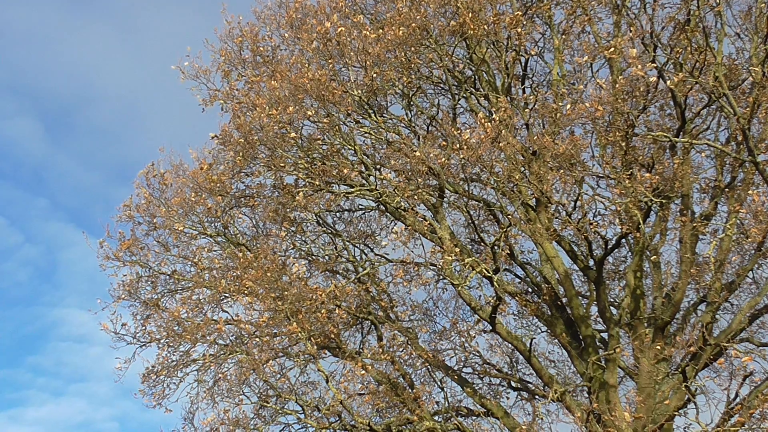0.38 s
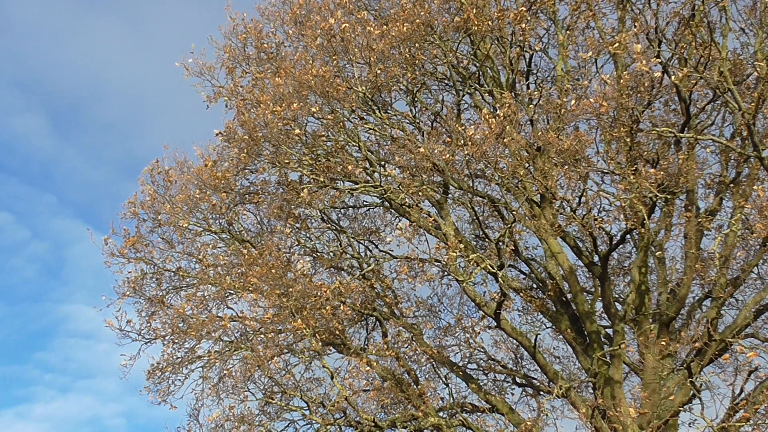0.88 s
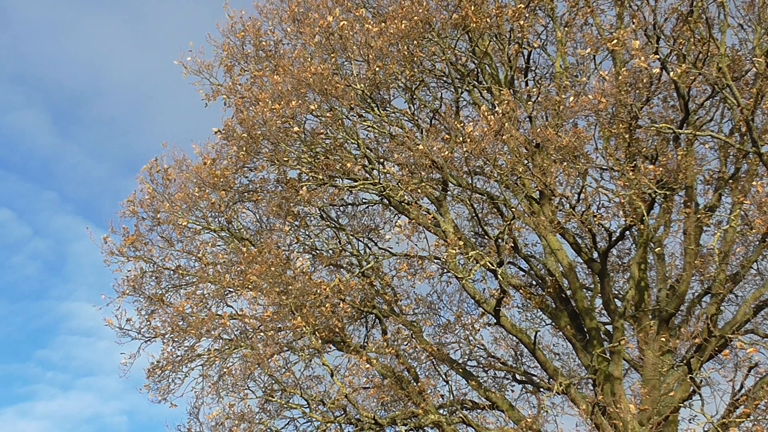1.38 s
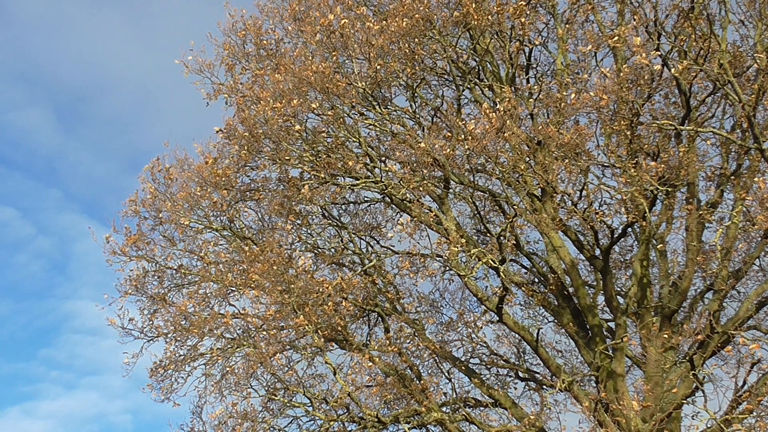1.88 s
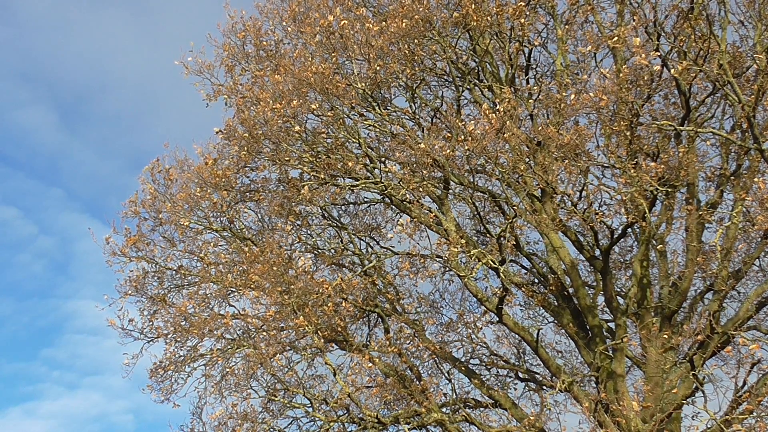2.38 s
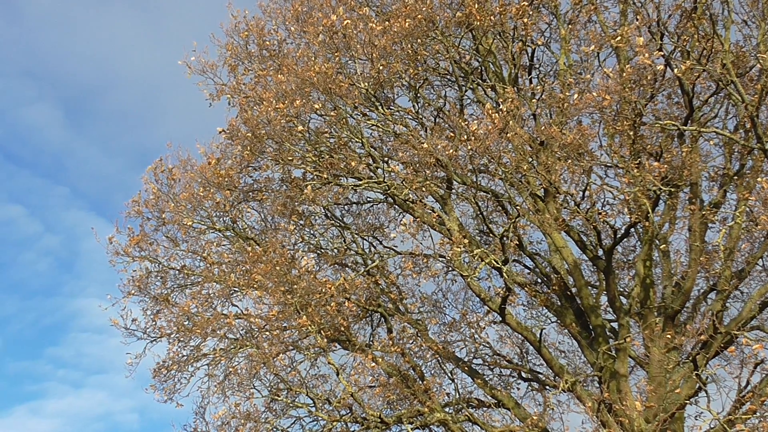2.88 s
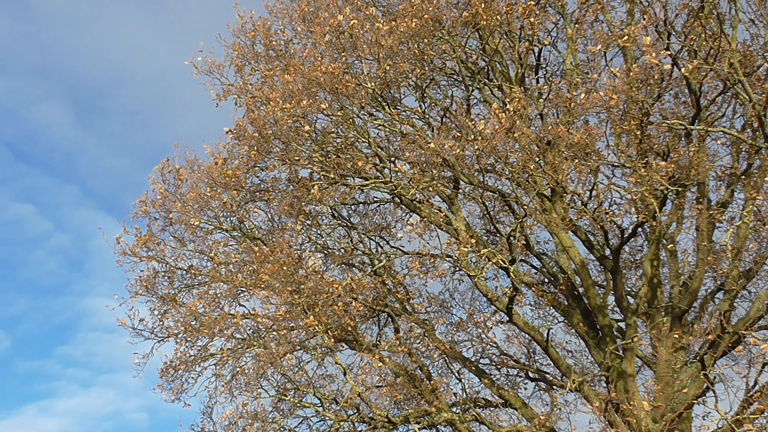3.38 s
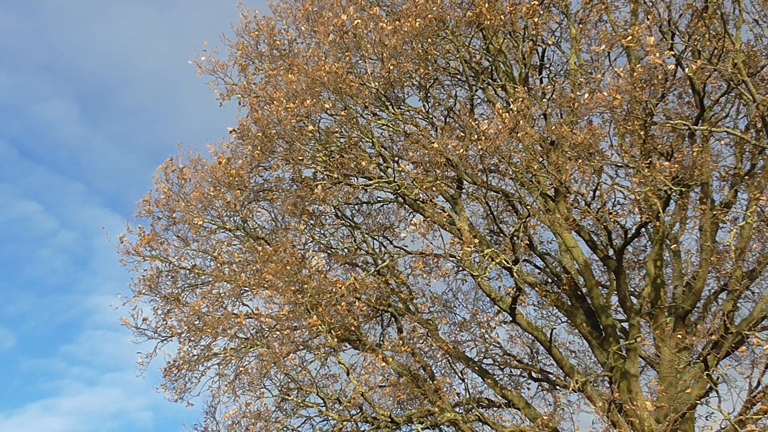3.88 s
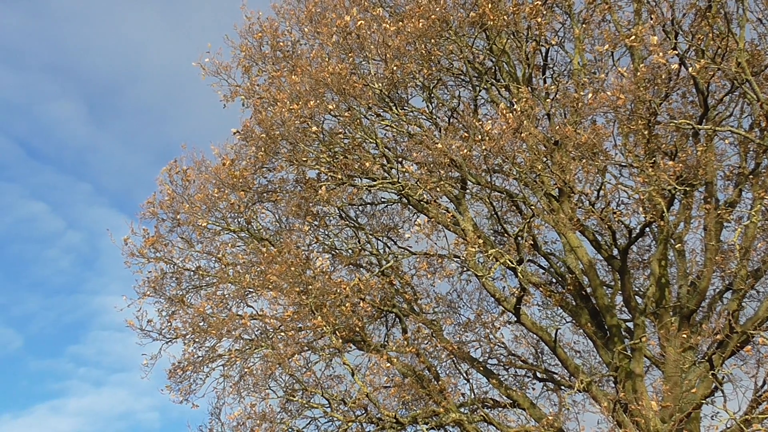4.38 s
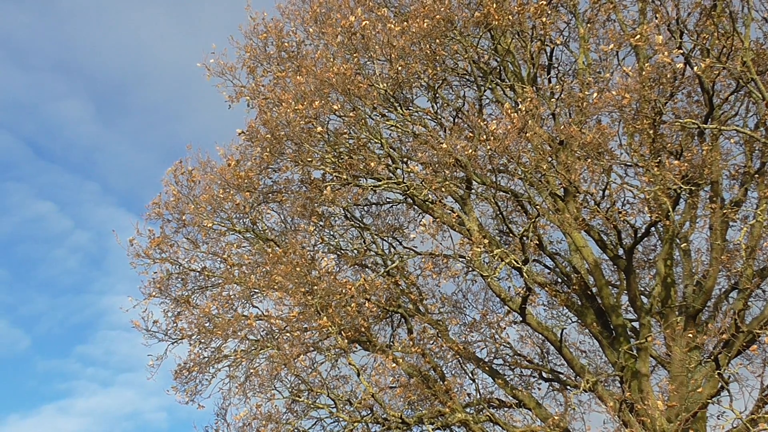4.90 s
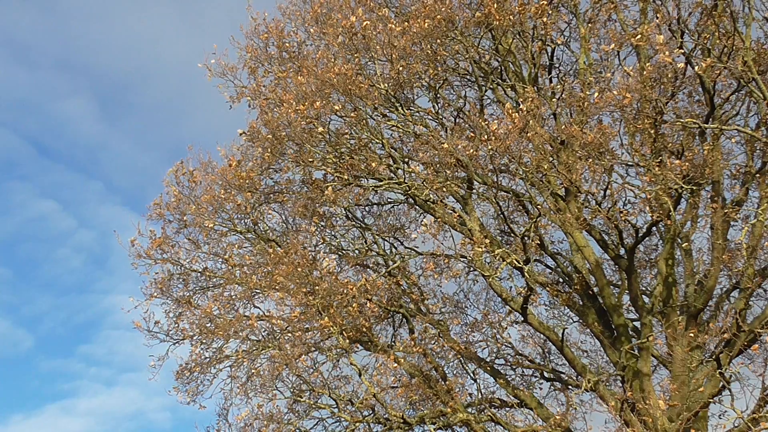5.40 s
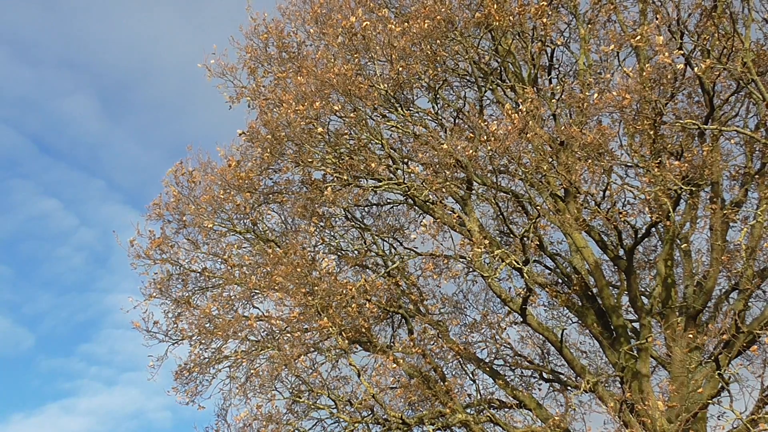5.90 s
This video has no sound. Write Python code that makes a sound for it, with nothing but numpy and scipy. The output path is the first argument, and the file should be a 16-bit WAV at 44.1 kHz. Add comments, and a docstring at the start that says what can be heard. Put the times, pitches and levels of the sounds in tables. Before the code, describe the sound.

After a tiny silence, broad low road noise starts abruptly and continues to the end. A quick run of high, warbling tit notes comes first, then a sharp dry tick, single whistles, a three-note call and a weaker pair. Soft ticks scatter through the later part. The birds are small and delicate over the roar, blurred by short reflections from twigs; dead leaves crackle very faintly, with a light hiss in the stereo microphone.

```python
"""After a blink of silence, far traffic roars steadily: shaped noise, its level drifting unevenly by band.
A falling engine sine passes in it; a narrow hiss near 5 kHz sits in the faint microphone-pair noise.
Small tits call thinly from a bare tree: falling, warbled two-voice whistles, most near 7 kHz, and dry ticks
of snap and rasp among crackling leaves. Dense random echoes from the branches scatter the tree's sounds."""
import sys
import numpy as np
from scipy import signal
from scipy.io import wavfile
from scipy.ndimage import uniform_filter1d

SR = 44100
rng = np.random.default_rng(int(sys.argv[2]) if len(sys.argv) > 2 else 0)


def elevation(decibels):
    """Turn decibel levels (scalar or array-like) into linear amplitude ratios."""
    levels = np.asarray(decibels, float)
    return 10 ** (levels / 20)


def waveform_to_disk(signal):
    """Save audio, clipped to [-1, 1], as 16-bit WAV at the path in sys.argv[1]."""
    frames = np.transpose(np.atleast_2d(signal))
    scaled = np.clip(frames, -1, 1) * 32767
    samples = np.round(scaled).astype(np.int16)
    wavfile.write(sys.argv[1], SR, samples)


N = 265482


def evened(x):
    """Scales to rms 1."""
    return x / np.sqrt(np.mean(x ** 2) + 1e-20)


def read(points, hz):
    """Interpolates a table on a log-frequency axis."""
    f, value = np.transpose(points)
    return np.interp(np.log(hz + 1), np.log(f + 1), value)


def add(mix, start_s, sound, pan_db):
    """Mixes a mono sound into both channels; pan_db is left over right."""
    part = mix[:, round(start_s * SR):][:, :len(sound)]
    gains = elevation([pan_db / 2, -pan_db / 2])[:, None]
    part += gains * sound[:part.shape[1]]


def resonate(x, hz, width_hz):
    """Two-pole resonance: shifts hz down to zero, smooths twice, shifts back."""
    turn = np.exp(2j * np.pi * hz * np.arange(x.shape[-1]) / SR)
    r = np.exp(-np.pi * width_hz / SR)
    smooth = signal.lfilter([(1 - r) ** 2], [1, -2 * r, r * r], x / turn)
    return 2 * (turn * smooth).real


# traffic spectrum before overall scaling: freq_hz, relative density_db [dB per Hz]
ROAR_SPECTRUM = [(20, -46), (40, -28), (60, -7.5), (100, 0.5), (150, -4), (230, -3.5), (380, -7.5),
                 (600, -1.5), (950, -0.5), (1300, -7.5), (2000, -21), (2900, -36.5), (4000, -58)]
# microphone noise on the same scale: freq_hz, relative density_db [dB per Hz]
MIC_NOISE = [(1500, -50), (3000, -38), (4500, -36), (6700, -41.5), (14000, -42.5), (16000, -46)]
# left-right likeness: freq_hz, likeness [0-1]
LIKENESS = [(60, 1), (150, 0.98), (380, 0.89), (950, 0.95), (2000, 0.72), (3200, 0.077), (6000, 0.084),
            (15000, 0.54)]
# left-right level difference: freq_hz, left_over_right_db
LEFT_LEAN = [(60, -1.4), (150, -1), (380, -0.3), (800, 1.3), (1500, 3.5), (3000, 0.5), (6000, 1.5),
             (15000, -1)]
# left-right phase difference: freq_hz, left_lead_rad
LEFT_LEAD = [(300, 0), (1000, 0.47), (2600, 0), (4000, 0.076)]
# slow swells of the roar: middle_s, length_s, centre_hz, swell_db [before removing the mean over time]
ROAR_SWELLS = [(.15, .5, 166, 1.3), (.2, 0.65, 1030, 1.1), (0.662, 0.43, 2300, 3), (1.1, 0.88, 3200, 1.4),
               (1.533, 0.34, 438, 4.5), (3.005, .8, 2410, 2.5), (3.198, 0.64, 850, 1.5),
               (3.95, 0.94, 95, 1.5), (4.148, 0.37, 241, 2.4), (4.8, 0.84, 800, 0.4),
               (4.7, 0.64, 3400, 0.7), (5.306, .5, 174, 2), (5.895, 0.82, 103, 4), (5.95, .5, 330, 1)]
SWELL_OCTAVES = 0.6  # 1/e half-width of one swell
ROAR_DB = -42.5  # rms, 400-1500 Hz


def traffic(patchy_db=0.43):
    """Road roar and microphone noise: random short-time spectra, patchy, the roar drifting band by band."""
    frames, hz = N // 512 + 5, np.fft.rfftfreq(2048, 1 / SR)
    t = np.arange(frames) * 512 / SR
    a, b, c, d, patches = rng.standard_normal((frames, 1025, 5)).T
    patches = uniform_filter1d(patches, size=20, axis=0)
    patches = evened(uniform_filter1d(patches, size=7, axis=1))

    drift_db = np.zeros((len(hz), frames))
    for middle_s, length_s, centre_hz, swell_db in ROAR_SWELLS:
        band = np.exp(-(np.log2((hz + 1) / centre_hz) / SWELL_OCTAVES) ** 2)
        swell = np.exp(-(2 * (t - middle_s) / length_s) ** 2)
        drift_db += swell_db * np.outer(band, swell)
    drift_db -= drift_db.mean(1, keepdims=True)
    road = elevation(read(ROAR_SPECTRUM, hz)[:, None] + drift_db + patchy_db * patches)
    field = np.hypot(road, elevation(read(MIC_NOISE, hz))[:, None])

    same = np.clip(read(LIKENESS, hz), 0, 1)[:, None]
    left, apart = a + 1j * b, c + 1j * d
    right = same * left + np.sqrt(1 - same ** 2) * apart
    lean = (elevation(read(LEFT_LEAN, hz) / 2) * np.exp(.5j * read(LEFT_LEAD, hz)))[:, None]
    z = np.array([left * lean, right / lean])
    sound = signal.istft(z * field, nperseg=2048, noverlap=1536)[1][:, :N]
    mid_band = signal.butter(4, [400, 1500], "band", fs=SR, output="sos")
    return sound * elevation(ROAR_DB) / signal.sosfilt(mid_band, sound.mean(0)).std()


# passing engine note: start_s, length_s, peak_db [rms at the top], from_hz, to_hz
ENGINE_NOTE = (.97, .31, -47.5, 233, 225)


def engine(skew=.62):
    """One low engine order, a sine: swells fast, fades slower, drops in pitch."""
    start_s, length_s, peak_db, from_hz, to_hz = ENGINE_NOTE
    u = np.arange(0, length_s, 1 / SR) / length_s
    note = np.sin(2 * np.pi * np.cumsum(from_hz + (to_hz - from_hz) * u) / SR)
    swell = np.sin(np.pi * u ** skew) ** 2  # skew < 1: early top
    return start_s, np.sqrt(2) * elevation(peak_db) * swell * note, 0


HISS_HZ, HISS_WIDTH_HZ, HISS_DB = 5100, 260, -77  # level is rms


def narrow_hiss(shared=.8, flicker_db=2.2):
    """Noise in one narrow resonance, partly shared by the channels, its level flickering."""
    one, apart = rng.standard_normal(N), rng.standard_normal((2, N))
    flicker = evened(uniform_filter1d(rng.standard_normal(N), size=1500))
    noise = shared * one + np.sqrt(1 - shared ** 2) * apart
    hiss = resonate(noise, HISS_HZ, HISS_WIDTH_HZ) * elevation(flicker_db * flicker)
    return elevation(HISS_DB) * evened(hiss)


# dry leaves: centre_hz, width_hz, level_db [rms before the branches], crackles_per_s
DRY_LEAVES = (5200, 3000, -86, 90)


def leaves(spread_db=3.6):
    """Faint crackles of dead leaves: decaying noise puffs, in clumps as the breeze stirs."""
    hz, width_hz, level_db, per_s = DRY_LEAVES
    breeze = np.exp(evened(uniform_filter1d(rng.standard_normal(N), size=4000)) - .5)
    loudness = elevation(spread_db * np.minimum(rng.exponential(1, N), 3))
    clicks = (rng.random(N) < per_s * breeze / SR) * loudness
    decay = np.exp(-np.arange(600) / 120)
    puffs = signal.oaconvolve(clicks, decay)[:N] * rng.standard_normal(N)
    return elevation(level_db) * evened(resonate(puffs, hz, width_hz))


DIRECT_DB, SCATTER_DB, ECHO_DB = -2, -8.5, -13
SCATTER_T60_S, ECHO_T60_S = .06, .3


def branches(x):
    """Dense twig reflections beat against each gliding call; a weaker, longer echo from the wood trails."""
    t = np.arange(SR // 2) / SR
    hits = rng.random((len(t), 2)).T < 2000 / SR
    taps = rng.standard_normal((len(t), 2, 2)).T * hits  # near/far, microphone, time
    taps[:, 1] = taps[:, 0] + 0.47 * taps[:, 1]  # microphones share part of the reflections
    tail = 0
    for tap, t60_s, level_db in zip(taps, (SCATTER_T60_S, ECHO_T60_S), (SCATTER_DB, ECHO_DB)):
        echo = tap * elevation(-60 * t / t60_s) * np.minimum(t / 0.0028, 1)
        tail = tail + elevation(level_db) * echo / np.linalg.norm(echo, axis=1)[:, None]
    return elevation(DIRECT_DB) * x + signal.fftconvolve(x, tail, axes=1)[:, :N]


TICK_WIDTH = 0.7  # share of the centre frequency


def tick(start_s, level_db, centre_hz, decay_s, pan_db, snap=2.2):
    """A sharp snap and a decaying broad rasp through one wide resonance."""
    decay_s = max(decay_s, .002)
    u = np.arange(round(4 * decay_s * SR)) / SR / decay_s
    rasp = rng.standard_normal(len(u)) * np.exp(-u)
    sound = resonate(rasp + snap * (u == 0), centre_hz, TICK_WIDTH * centre_hz)
    return start_s, elevation(level_db) * evened(sound) / 2, pan_db


# ticks: start_s, level_db [twice the rms, before pan and branches], centre_hz, decay_s [at least 0.002],
# pan_db [left over right]
TICK_CALLS = [(1.197, -53.5, 5040, .0022, 4), (2.604, -67, 6800, 0.011, 4), (2.7495, -61, 5900, .0042, 2),
              (2.799, -63, 6800, .0033, -2), (3.4754, -63, 6000, .003, 5), (3.490, -64, 4300, 0.0051, 9),
              (3.817, -67, 5700, 0.0051, 3), (4.2785, -65, 6900, 0.0087, 0), (4.494, -68, 5240, .005, -9),
              (4.603, -69, 6300, .016, 1), (5.03, -65.5, 5700, .012, -9), (5.2829, -68, 5800, .0036, -14),
              (5.308, -70, 6500, .01, -1), (5.548, -60, 5900, 0.0063, 0), (5.991, -63, 5900, .007, -1)]


def dry_ticks(tree):
    """Adds the birds' dry tick calls to the tree."""
    for row in TICK_CALLS:
        add(tree, *tick(*row))


ONSET_DB, END_DB, HOLD = -11, -10., 2.2  # note ends re its peak; larger HOLD flattens the top
UPSWING_HZ, UPSWING_S = 260., 0.0039  # slide up into the note
SECOND_VOICE_HZ = 230  # mean distance of the lower voice


def whistle(start_s, length_s, peak_db, top_hz, end_hz, depth_hz, warble_hz, second, peak, pan_db,
            shaky_hz=35, flutter=.25):
    """Two near-sines from the halves of the syrinx beat into a buzz; pitch swings up, falls, warbles."""
    t = np.arange(0, length_s, 1 / SR)
    peak, second = np.clip(peak, .1, .9), np.clip(second, 0, 1)
    slope_db = np.where(t < peak * length_s, ONSET_DB / peak ** HOLD, END_DB / (1 - peak) ** HOLD)
    level_db = peak_db + slope_db * abs(t / length_s - peak) ** HOLD

    noises = rng.standard_normal((3, len(t)))
    shake, throb, drift = (evened(uniform_filter1d(v, size=250)) for v in noises)
    warble = -np.cos(2 * np.pi * warble_hz * t) * np.linspace(1.2, .5, num=len(t))  # calms
    glide_hz = top_hz + (end_hz - top_hz) * t / length_s - UPSWING_HZ * np.exp(-t / UPSWING_S)
    upper_hz = glide_hz + second * SECOND_VOICE_HZ / 2 + depth_hz * warble + shaky_hz * shake
    lower_hz = upper_hz - SECOND_VOICE_HZ * (1 + .15 * drift)
    upper, lower = (np.sin(2 * np.pi * np.cumsum(f) / SR) for f in (upper_hz, lower_hz))
    tone = (1 + flutter * throb) * upper + second * (1 - flutter * throb) * lower
    sound = elevation(level_db) * evened(tone) * signal.windows.tukey(len(t), .1)
    return start_s, sound, pan_db


# notes, one list a call, the low one a farther bird: start_s, length_s, peak_db [rms at the top, before
# pan and branches], start_hz, end_hz [glide before voice offset, upswing and warble]
CALL_NOTES = [
    [(.727, 0.085, -60.5, 7160, 6760), (.805, .064, -60.5, 6830, 6600), (0.864, 0.067, -55.5, 6850, 6540),
     (0.928, .09, -68, 6630, 6480)],
    [(0.733, 0.056, -69, 4820, 4480)],
    [(1.44, 0.087, -58, 7180, 6680)],
    [(2.425, 0.066, -52, 7360, 6780)],
    [(3.343, 0.076, -59.5, 7040, 6750), (3.444, .074, -63.5, 6640, 6240), (3.535, .062, -70, 6730, 6440)],
    [(4.033, .092, -65, 6980, 6350), (4.176, .066, -69, 6800, 6330)],
]
# one a call: warble_depth_hz [times 1.2 falling to 0.5], warble_rate_hz, second_voice_share [0-1],
# first_note_peak_place [0-1], pan_db [left over right]
CALL_VOICES = [(120, 62, 0.62, 0.2, 0), (250, 87, .8, .4, 1), (190, 50, 0.37, 0.55, -2),
               (98, 80, 0.44, .32, -1), (50, 58, .35, 0.55, -6), (50, 54, 0.56, .35, 1)]
LATER_PEAK = .2  # later notes of a call peak this share of their length later


def whistled_calls(tree):
    """Adds the tits' whistles to the tree, each call in its own voice."""
    for call, (*warble, peak, pan_db) in zip(CALL_NOTES, CALL_VOICES):
        for k, note in enumerate(call):
            place = peak + LATER_PEAK * (k > 0)
            add(tree, *whistle(*note, *warble, place, pan_db))


def scene():
    """Birds in the tree over the far road."""
    road = traffic()
    add(road, *engine())
    tree = np.zeros((2, N)) + leaves()
    dry_ticks(tree)
    whistled_calls(tree)
    return road + narrow_hiss() + branches(tree)


def band_limit(x):
    """A steep low-pass at the top of the band."""
    return signal.sosfilt(signal.butter(12, 16210, fs=SR, output="sos"), x)


START_S, EDGE_HZ = .0416, 15800


def record(dry):
    """The sound cuts in after a moment of silence, under a steep low-pass."""
    started = dry * (np.arange(N) > START_S * SR)
    edge = signal.firwin(511, EDGE_HZ, window=("kaiser", 9), fs=SR)
    mix = signal.oaconvolve(started, edge[None], "same")
    return band_limit(mix)


dry = scene()
out = record(dry)
waveform_to_disk(out)
```